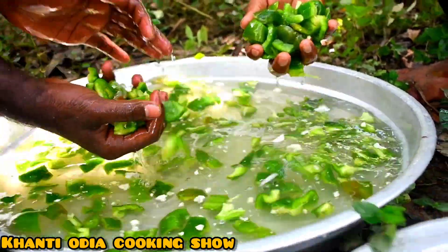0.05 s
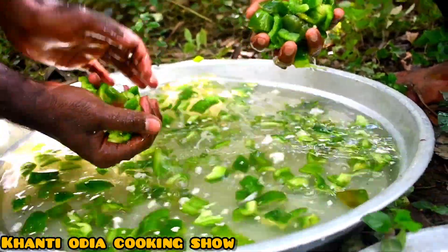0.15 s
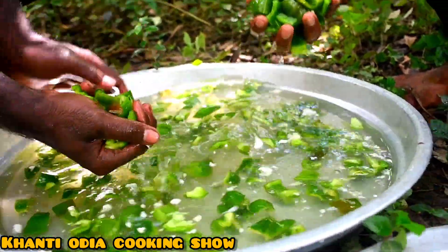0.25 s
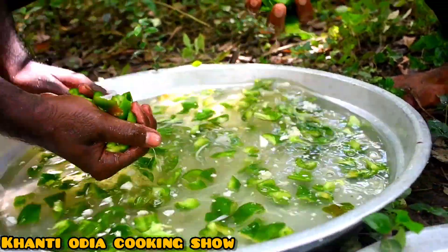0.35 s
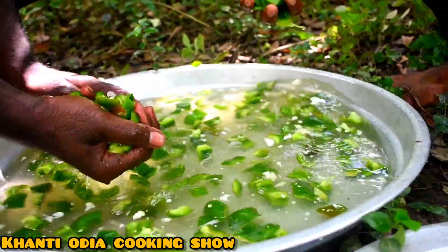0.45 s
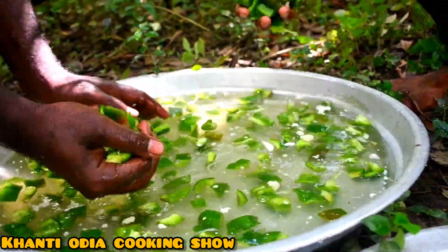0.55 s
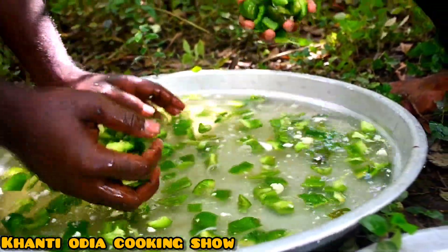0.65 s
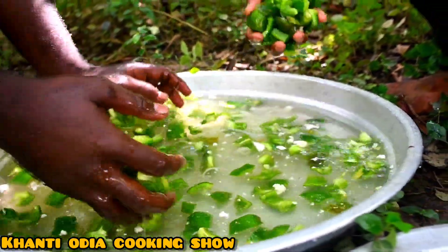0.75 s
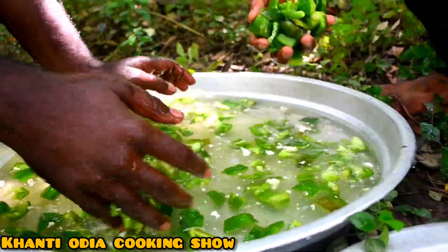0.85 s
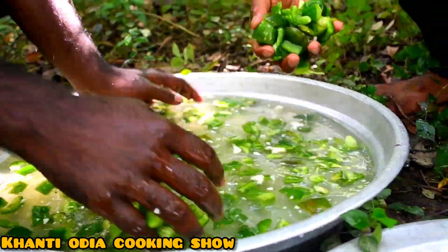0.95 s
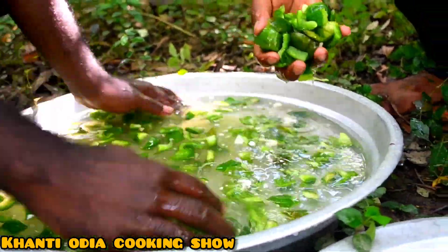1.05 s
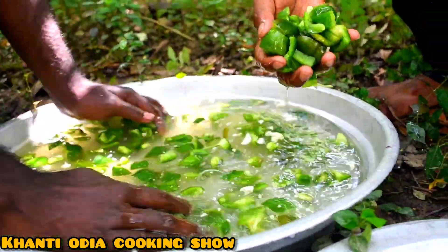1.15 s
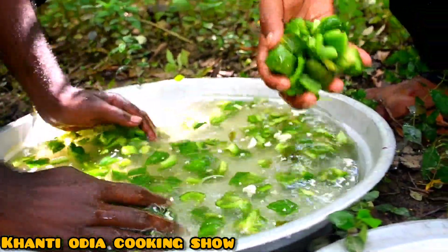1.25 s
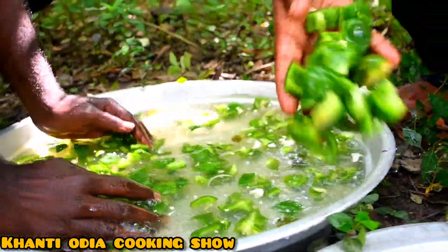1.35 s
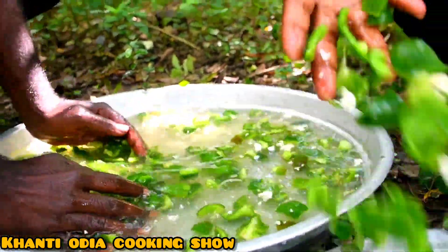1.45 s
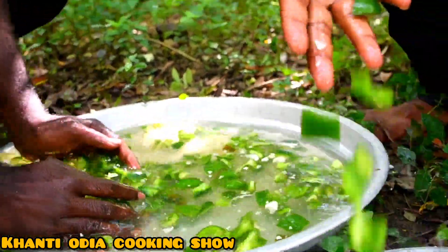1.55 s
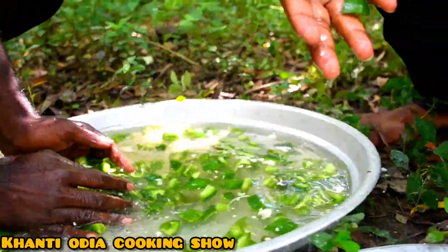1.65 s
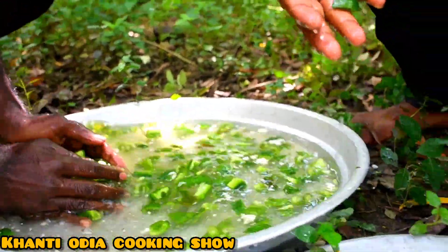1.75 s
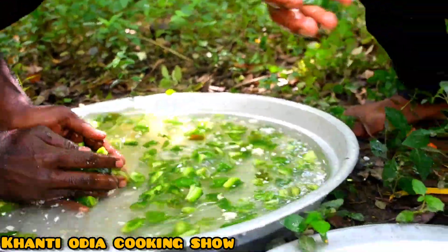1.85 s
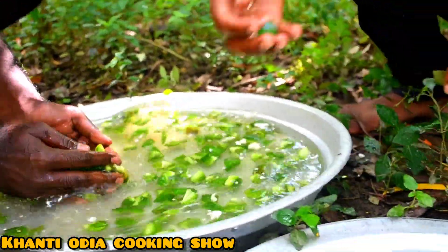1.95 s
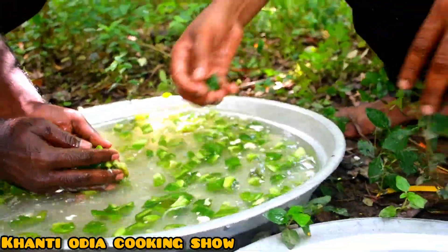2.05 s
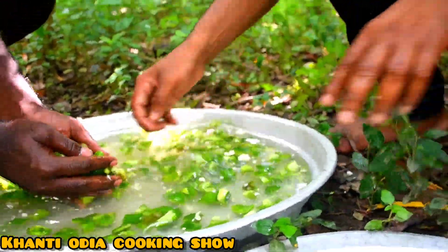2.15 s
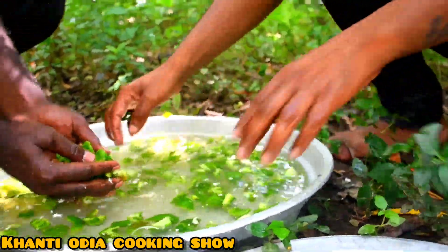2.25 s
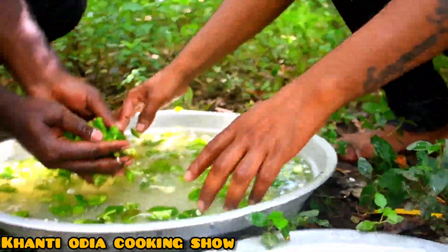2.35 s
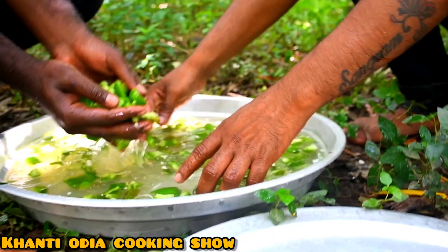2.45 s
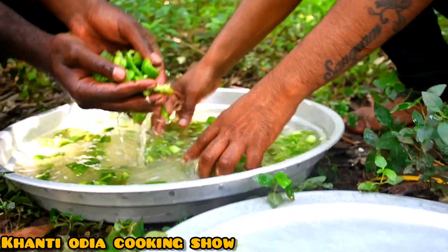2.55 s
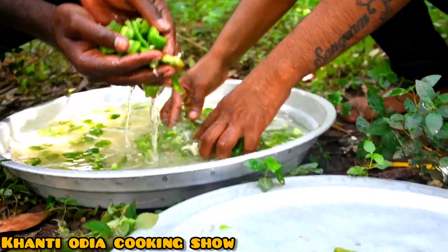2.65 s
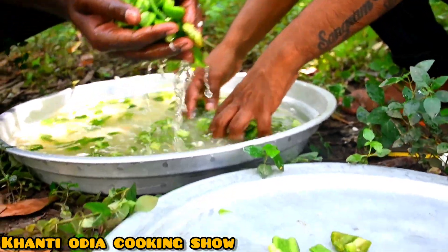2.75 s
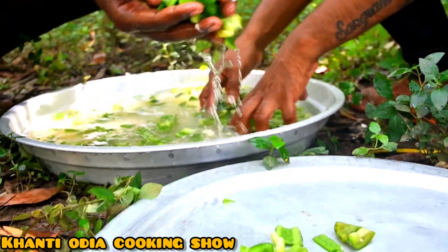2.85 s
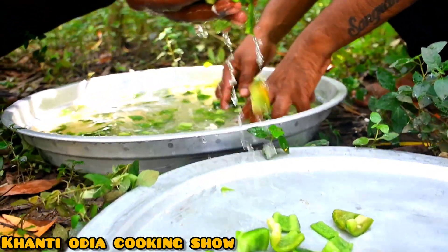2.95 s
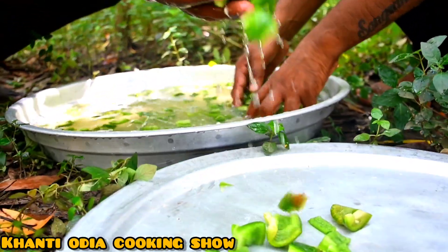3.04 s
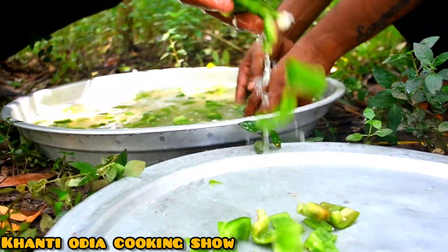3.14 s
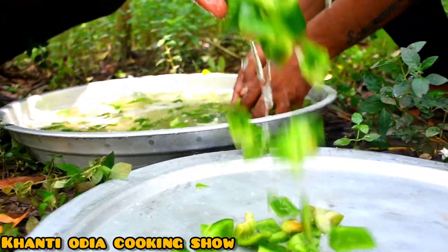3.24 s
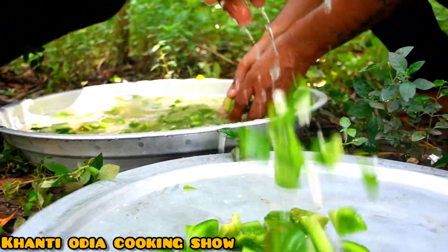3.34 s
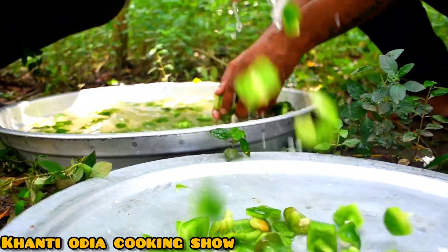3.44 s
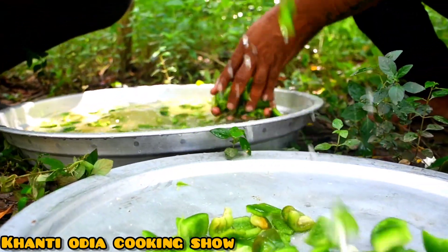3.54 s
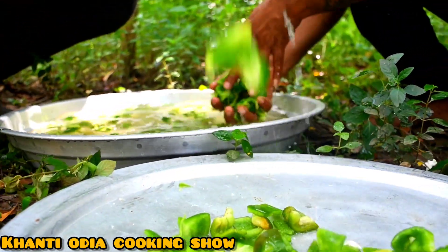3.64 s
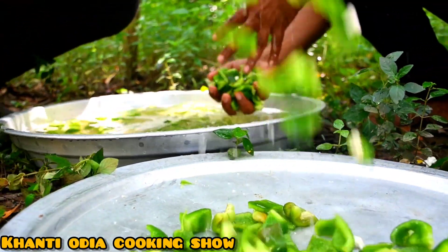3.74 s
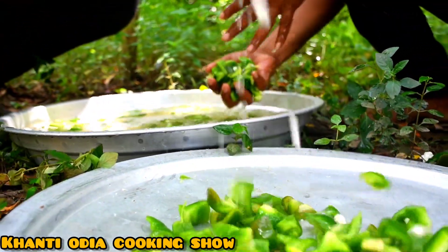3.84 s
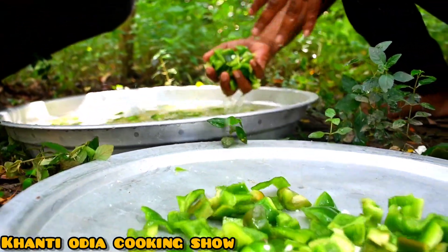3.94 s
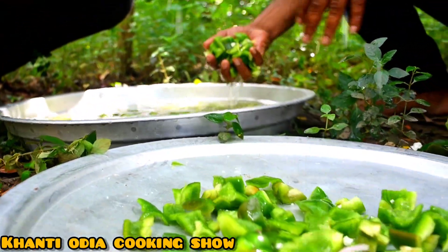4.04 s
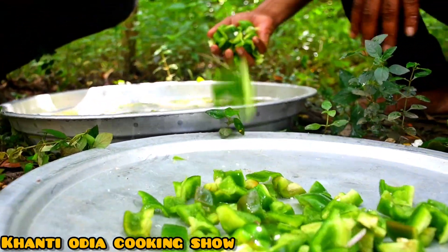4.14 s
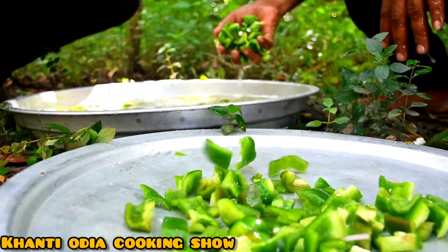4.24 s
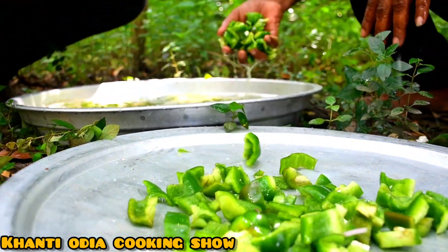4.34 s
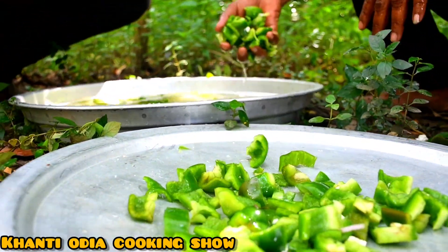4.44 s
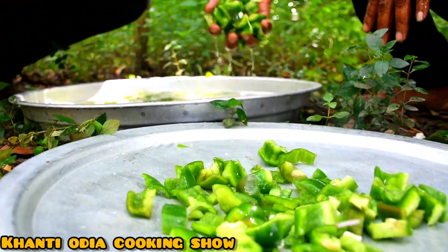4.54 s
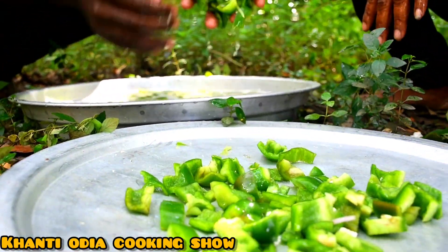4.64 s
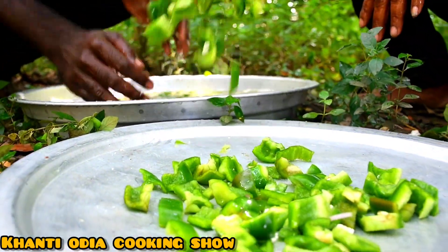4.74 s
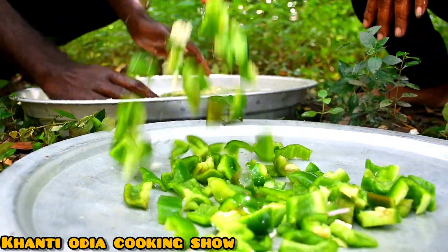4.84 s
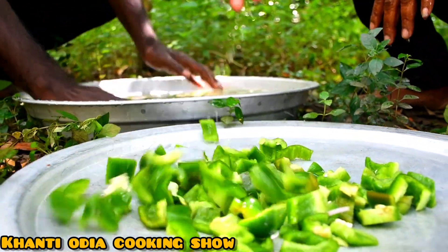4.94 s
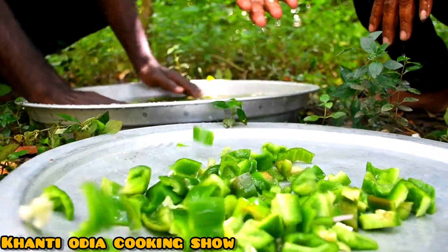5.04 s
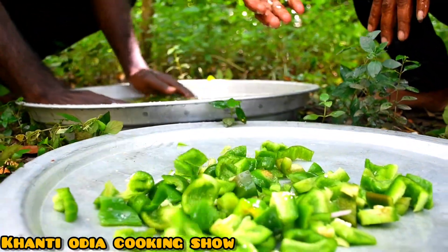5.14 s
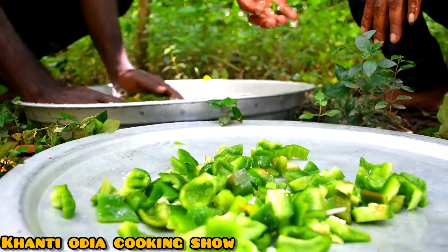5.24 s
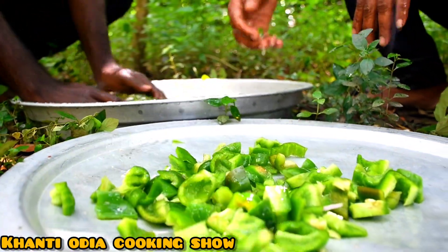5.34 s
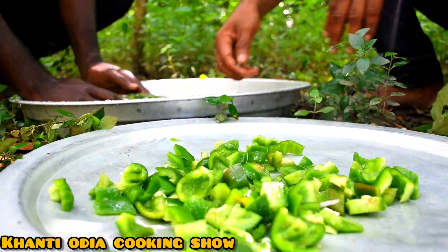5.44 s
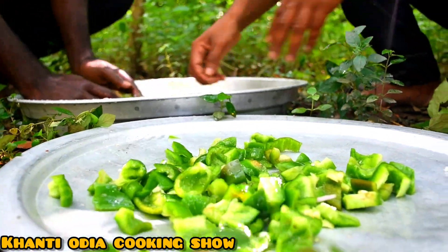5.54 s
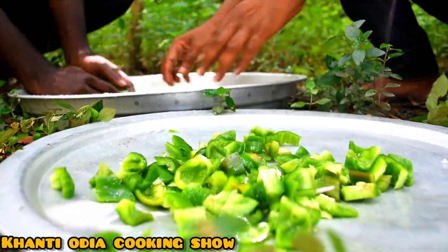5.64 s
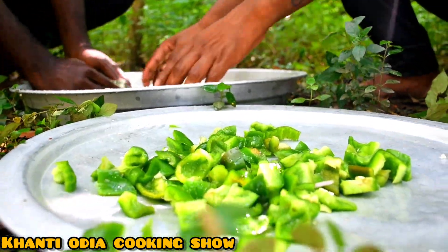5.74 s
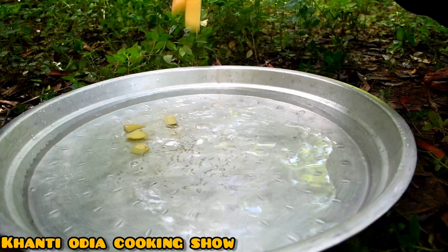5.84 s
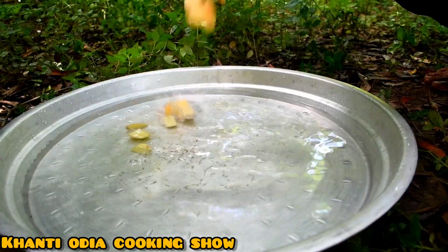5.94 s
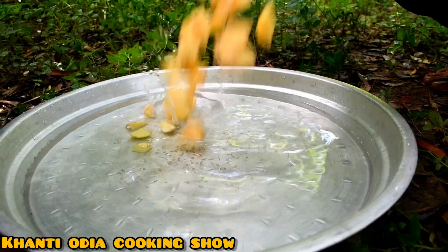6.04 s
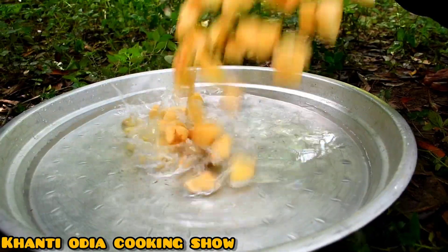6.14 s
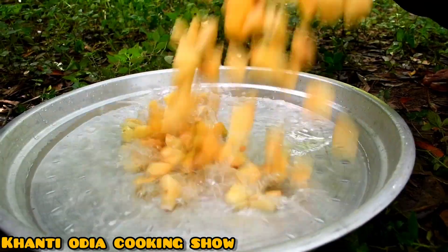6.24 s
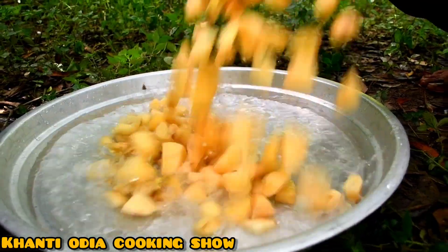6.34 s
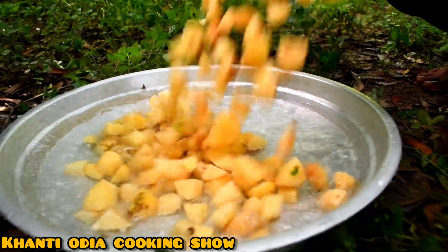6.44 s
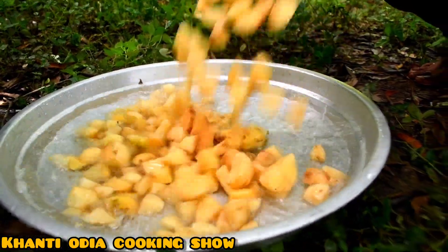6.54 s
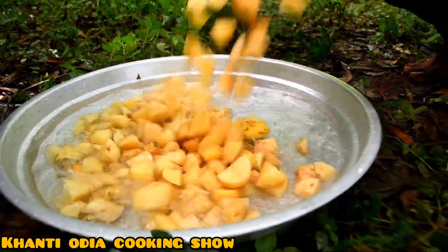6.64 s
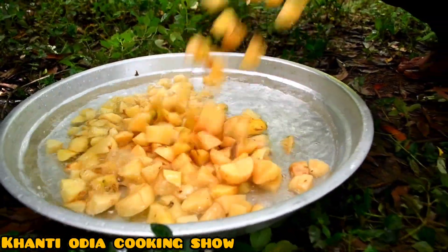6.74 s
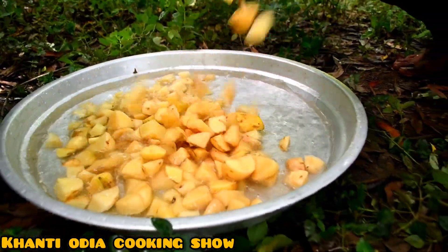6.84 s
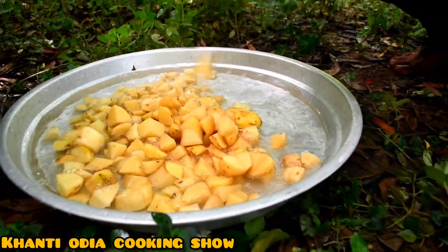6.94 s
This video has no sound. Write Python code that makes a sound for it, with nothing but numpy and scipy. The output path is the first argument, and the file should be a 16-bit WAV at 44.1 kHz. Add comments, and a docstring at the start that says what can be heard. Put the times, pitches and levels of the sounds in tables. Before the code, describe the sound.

Wet vegetable chunks clatter in handfuls onto a thin metal tray outdoors, with water drips and trickles between, then heavier pieces pour splashing into shallow water.

```python
"""A soft dull knock on thin metal is heard first over insect hiss, then water drips and trickles.
Wet vegetable pieces, scooped from a metal basin outdoors, are thrown on a thin tray: its damped modes ring.
Filtered grainy noise makes the tumbling and spray; brief rising sines make drops and bubbles.
At the end heavier pieces pour into a tray of shallow water; a close pair of microphones listens."""
import sys
import numpy as np
from scipy import signal
from scipy.fft import rfft, irfft, next_fast_len
from scipy.io import wavfile
from scipy.ndimage import uniform_filter1d

SR = 44100
rng = np.random.default_rng(int(sys.argv[2]) if len(sys.argv) > 2 else 0)


def store_wav(level_fs):
    """Save 16-bit WAV to argv[1]."""
    pcm = np.round(np.clip(np.atleast_2d(level_fs), -1, 1) * 32767)
    wavfile.write(sys.argv[1], SR, pcm.T.astype(np.int16))


N = 308259


def gain_of(db):
    """Amplitude factor of a level in dB."""
    return 10 ** (np.asarray(db) / 20)


def evened(x):
    """Scales to unit RMS."""
    return x / np.sqrt(np.mean(x ** 2) + 1e-20)


def read(points, hz):
    """Interpolates a table of (Hz, value) on a log frequency axis."""
    point_hz, value = np.transpose(points)
    return np.interp(np.log(hz + 1), np.log(point_hz + 1), value)


def coloured(x, points):
    """Filters by a gain curve in dB over frequency."""
    length = x.shape[-1]
    size = next_fast_len(length)
    gain = gain_of(read(points, np.fft.rfftfreq(size, 1 / SR)))
    return irfft(rfft(x, size) * gain, size)[..., :length]


def band(x, hz, spread):
    """Band-pass from hz / spread to hz * spread."""
    edges_hz = np.clip([hz / spread, hz * spread], 30, .45 * SR)
    return signal.sosfilt(signal.butter(2, edges_hz, "band", fs=SR, output="sos"), x)


def decay(t, t60_s):
    """Exponential fade, 60 dB in t60_s."""
    return gain_of(-60 * t / t60_s)


def peaked(x):
    """Scales to unit peak."""
    return x / abs(x).max()


def curve(tables, column):
    """One dB column over the whole scene, silent outside the tables."""
    t, level_db = np.arange(N) / SR, np.full(N, -150.)
    for rows in map(np.array, tables):
        inside = (t >= rows[0, 0]) & (t <= rows[-1, 0])
        level_db[inside] = np.interp(t[inside], rows[:, 0], rows[:, column])
    return level_db


def swells(rows, column, rise_s, db_per_s):
    """Levels rise up to full_s, hold, then fade at a steady dB rate; overlaps add in power."""
    t, power = np.arange(N) / SR, np.zeros(N)
    for row in rows:
        full_s, hold_s = row[:2]
        rise = np.clip((t - full_s) / rise_s + 1, 0, 1)
        level_db = row[column] - db_per_s * np.maximum(t - full_s - hold_s, 0)
        power += (rise ** 2 * gain_of(level_db)) ** 2
    return np.sqrt(power)


def paired(two, likeness):
    """Mixes two unrelated signals into a left and right that agree as far as the likeness says."""
    size = next_fast_len(N)
    common, apart = rfft(two, size)
    same = np.clip(read(likeness, np.fft.rfftfreq(size, 1 / SR)), 0, 1)
    mid, side = np.sqrt((1 + same) / 2) * common, np.sqrt((1 - same) / 2) * apart
    return irfft(np.array([mid + side, mid - side]), size)[:, :N]


def add(mix, start_s, sound, left_minus_right_db):
    """Adds a sound at start_s with a level difference between the sides."""
    part = mix[:, round(start_s * SR):][:, :sound.shape[-1]]
    panned = sound * gain_of([[left_minus_right_db / 2], [-left_minus_right_db / 2]])
    part += panned[:, :part.shape[1]]


def grainy(per_s, spread_db, t60_s, steady):
    """Two noises whose loudness jumps with sparse arrivals of random size, each dying in t60_s."""
    sizes = gain_of(spread_db * np.minimum(rng.exponential(1, N), 4))
    arrivals = sizes * (rng.random(N) < per_s / SR)
    loudness = signal.lfilter([1], [1, -1000 ** (-1 / (t60_s * SR))], arrivals)
    return (steady + evened(loudness)) * rng.standard_normal((2, N))


def rung(blows, modes, linger):
    """Blows set resonators ringing, each linger times as long as its tabled t60."""
    out = 0
    for hz, db, t60_s in modes:
        radius, turn = 1000 ** (-1 / (linger * t60_s * SR)), 2 * np.pi * hz / SR
        poles = [1, -2 * radius * np.cos(turn), radius * radius]
        out = out + gain_of(db) * np.sin(turn) * signal.lfilter([1], poles, blows)
    return evened(out)


def bubbles(per_s, low_hz, high_hz, turns, count):
    """Short rising sine grains scattered at random, a few large."""
    out = np.zeros((2, N))
    for hz in np.geomspace(low_hz, high_hz, count):
        cycles = np.arange(int(3 * turns * SR / hz)) * hz / SR
        grain = np.sin(2 * np.pi * cycles * (1 + 0.1 * cycles / turns))
        grain = grain * np.exp(-1.5 * cycles / turns) * (1 - np.exp(-cycles))
        sizes = gain_of(1.5 * np.minimum(rng.exponential(1, N), 4))
        arrivals = sizes * (rng.random(N) < per_s / count / SR)
        out += signal.oaconvolve(arrivals, grain)[:N] * rng.uniform(0.11, 1, (2, 1))
    return evened(out)


# droplet size bands: centre_hz
DROPLET_BANDS = (1700, 3500, 7200, 14000)
# colour of flying water: freq_hz, gain_db
SPLASH_COLOUR = [(710, -38.5), (1200, -8), (1700, -5), (2600, -4.5), (9010, -2), (12100, -18),
                 (14400, -13.5), (16000, -27.5)]


def spatter(per_s, spread_db, t60_s, steady):
    """Flying water: droplets of each size crackle in a band of their own."""
    bands = sum(band(grainy(per_s, spread_db, t60_s, steady), hz, 1.55) for hz in DROPLET_BANDS)
    return evened(coloured(bands, SPLASH_COLOUR))


# left-right agreement of the yard: freq_hz, likeness_0_to_1
YARD_LIKENESS = [(60, 1), (300, 0.86), (700, 0.84), (1500, 0.48), (3000, 0.15)]
# colour of the yard: freq_hz, gain_db
YARD_COLOUR = [(24, -41), (40, -6), (96, -3), (147, -7), (680, -14.5), (1480, -16.5), (2840, -18.5),
               (4800, -18), (5440, -15.5), (6300, -18), (7400, -19.5), (9000, -13.5), (11500, -27),
               (14500, -26), (16000, -39)]
# insect songs: full_s, hold_s, level_db
INSECT_SONGS = [(.32, 0.36, -70), (2.62, .2, -67), (4.5, 0.31, -57.5)]


def yard():
    """Noise shaped as distant rumble and insect hiss, stray drips, and an insect trilling on a narrow band."""
    hiss = evened(coloured(paired(rng.standard_normal((2, N)), YARD_LIKENESS), YARD_COLOUR))
    waver_db = 1.2 * evened(uniform_filter1d(rng.standard_normal(N), size=6000))
    air = gain_of(-57) * hiss * gain_of(waver_db)
    drips = spatter(40, 3.5, .02, .1) + .5 * bubbles(25, 900, 5000, 6, count=10)
    trill = 0.45 + np.sin(np.pi * 47.4 * np.arange(N) / SR) ** 2  # 47.4 pulses per s
    song = evened(trill * band(rng.standard_normal((2, N)), 5460, 1.025))
    return air + gain_of(-66.5) * drips + swells(INSECT_SONGS, 2, 0.029, 250) * song


# dull bumps through the ground: start_s, level_db, pitch_hz
GROUND_BUMPS = [(2.788, -35.5, 183), (3.255, -45, 45), (4.162, -38, 177)]


def bumps():
    """A soft low push of a few cycles, dying exponentially."""
    out = np.zeros((2, N))
    for start_s, level_db, hz in GROUND_BUMPS:
        cycles = np.arange(int(4 * SR / hz)) * hz / SR
        push = np.sin(2 * np.pi * cycles) * np.exp(-1.3 * cycles)
        add(out, start_s, gain_of(level_db) * push, -2.5)
    return out


# trapped bubbles: start_s, level_db, first_pitch_hz, last_pitch_hz, length_s
TRAPPED_BUBBLES = [ (5.728, -53, 1310, 1400, 0.051), (6.211, -20.5, 1560, 1680, 0.026),
                   (0.121, -36.5, 1300, 2280, 0.029), (1.074, -26, 5200, 5600, 0.0037),
                   (1.196, -51, 1060, 1120, 0.026), (1.223, -31.5, 1950, 3900, 0.021),
                   (1.221, -43.5, 1166, 1270, 0.021), (1.224, -34, 4120, 4300, 0.0049),
                   (1.289, -36.5, 2800, 3500, 0.01), (2.542, -33.5, 4850, 5400, 0.01),
                   (2.713, -37, 2080, 2480, 0.018), (2.818, -43, 1127, 1340, 0.047),
                   (3.091, -35, 4750, 5000, 0.0097), (4.367, -38, 1550, 2230, 0.055),
                   (5.29, -49.5, 1250, 1470, 0.033)]


def gurgles():
    """A bubble swells, and its pitch climbs as it nears the surface."""
    out = np.zeros((2, N))
    for start_s, level_db, first_hz, last_hz, length_s in TRAPPED_BUBBLES:
        u = np.linspace(0, 1, int(length_s * SR))
        # ripples shake the bubble
        wobble = 1 + 3.5 * uniform_filter1d(rng.standard_normal(3000), size=90)[:len(u)]
        cycles = np.cumsum(first_hz + (last_hz - first_hz) * u ** 1.5) / SR
        envelope = np.sqrt(12 * u) * np.exp(-3.2 * u) * (1 - u ** 4)
        add(out, start_s, gain_of(level_db) * wobble * np.sin(2 * np.pi * cycles) * envelope, -3.)
    return out


# drops bursting on water or metal: start_s, burst_level_db, pitch_hz, tick_re_burst_db
BURSTING_DROPS = [(0.0945, -36, 2870, -11), (0.121, -28, 6000, -5), (0.2173, -22, 1350, 0.5),
                  (0.754, -37, 4300, 3), (0.763, -32.5, 6200, 6), (0.823, -38, 3980, 8.5),
                  (0.83, -36.5, 1200, -5), (0.868, -39.5, 5070, 20), (0.888, -40.5, 1420, -13),
                  (0.9007, -41.5, 5500, 14.5), (0.997, -36, 3400, -9), (1.0278, -35.5, 1370, -14),
                  (1.059, -36, 5900, 8), (1.125, -36, 7740, -4), (2.45, -37, 4470, -4),
                  (2.481, -30.5, 1082, 3), (2.548, -40, 1350, -13), (2.618, -34.5, 2750, -1),
                  (2.663, -42, 2500, -15), (2.7281, -31.5, 2900, 8), (2.785, -36.5, 1890, -2),
                  (2.812, -33, 5560, -3), (2.938, -26.5, 8400, -3), (2.986, -37, 7000, -9),
                  (3.023, -36, 900, 10.5), (4.051, -34, 2360, -18), (4.229, -37.5, 2400, 1),
                  (4.4198, -36.5, 1790, 2.5), (4.473, -39, 6840, -7), (4.524, -34.5, 7370, -8),
                  (5.188, -31.5, 8100, -12), (5.926, -12, 5260, -10), (5.9359, -13.5, 1970, 5.5),
                  (6.04, -20.5, 3700, 10), (6.084, -15, 6500, -6), (6.25, -19, 2070, -15),
                  (6.432, -17.5, 4470, -3), (6.478, -29, 1500, -20), (6.573, -24.5, 1850, 10),
                  (6.587, -18, 4640, -4), (6.626, -21.5, 2520, -6), (6.775, -27, 6650, 3),
                  (6.126, -10, 7260, 4.5), (6.139, -15, 6030, 6), (6.173, -12, 3500, -18),
                  (6.2243, -9, 2510, -10), (6.263, -13, 2260, -4), (6.306, -24, 2350, 16),
                  (6.401, -9.5, 4220, 2), (6.4962, -17.5, 4070, -17), (6.613, -15.5, 3570, 6.5),
                  (6.64, -17, 3720, 8), (6.668, -30.5, 4850, 13), (6.74, -23, 7600, 6),
                  (6.791, -24.5, 5560, 5.5), (6.8704, -30, 4970, 7.5)]
DROP_T60_AT_1K_S, DROP_T60_SLOPE = 0.024, -0.41  # smaller, higher cavities die sooner


def drops():
    """A sharp tick; the cavity that the drop punches rings briefly, its pitch climbing, in a puff of spray."""
    t, out = np.arange(4000) / SR, np.zeros((2, N))
    for start_s, burst_db, hz, tick_db in BURSTING_DROPS:
        t60_s = DROP_T60_AT_1K_S * (hz / 1000) ** DROP_T60_SLOPE
        fade = decay(t, t60_s)
        noise = rng.standard_normal((3, len(t)))
        puff = band((noise[0] + 0.5 * noise[1:]) * fade, hz, 1.62)
        plop = np.sin(2 * np.pi * hz * t * (1 + .06 * t / t60_s)) * fade * (1 - np.exp(-t * hz)) ** 2
        burst = peaked(peaked(plop) + .9 * peaked(puff))
        tick = band(noise[1:] * (decay(t, 0.015) + 0.29 * decay(t, 0.081)), 5900, 1.66)
        add(out, start_s, gain_of(burst_db) * (burst + gain_of(tick_db) * peaked(tick)), -2.)
    return out


# hands swishing, water running off them: full_s, hold_s, level_db
HAND_SWISHES = [(.2, 0.025, -49.5), (.79, 0.095, -49), (.99, 0.084, -43.5), (1.18, 0.11, -54.5),
                (1.95, 0.041, -44), (2.05, 0.18, -56.5), (2.44, 0.18, -46.5), (2.7, 0.064, -44.5),
                (2.85, 0.21, -48), (5.47, 0.054, -53.5), (5.7, 0.32, -56), (5.89, 0.058, -47)]
SWISH_RISE_S, SWISH_DB_PER_S = 0.033, 115.5


def trickle():
    """Fine spatter, small bubbles and a few larger, lower ones as water runs off the hands."""
    fine = spatter(130, 3.6, 0.018, 0.4)
    small = bubbles(200, 1300, 6000, 4, count=12)
    large = bubbles(120, 380, 990, 2, count=8)
    level = swells(HAND_SWISHES, 2, SWISH_RISE_S, SWISH_DB_PER_S)
    return level * (fine + 0.27 * small + 0.1 * large)


# heavy pieces into shallow water, one list per pour: time_s, thump_level_db, splash_level_db
POUR_LEVELS = [
    [(5.922, -39, -25), (5.945, -28, -32), (6.0, -31.5, -43), (6.035, -30, -25), (6.14, -27.5, -24),
     (6.25, -26.5, -17), (6.38, -29, -25.5), (6.5, -32.5, -28), (6.74, -37, -39), (6.82, -47, -44),
     (6.99, -67.5, -59.5)],
]
# colour of pieces on the flooded tray: freq_hz, gain_db
THUMP_COLOUR = [(41, -44), (70, -25.5), (162, -6), (374, -6.5), (482, -8.5), (802, -5.5), (945, -4.5),
                (1850, -17), (2500, -23), (3250, -77)]
# modes of the tray under water: pitch_hz, gain_db, t60_s
FLOODED_MODES = [(490, 7.5, 0.06), (570, -0.5, 0.073), (660, 16, 0.015), (1000, 0, 0.047)]
# left-right agreement of close sounds (pour and heaps): freq_hz, likeness_0_to_1
NEAR_LIKENESS = [(200, 0.94), (600, 0.97), (1200, 0.69), (2500, 0.51), (6000, 0.031)]


def pour():
    """Dense thumps that keep the flooded tray ringing, a crackling splash and popping bubbles."""
    blows = grainy(250, 2.5, .025, .9)
    ringing = band(rung(blows, FLOODED_MODES, 1), 750, 2.5)
    thumps = evened(evened(coloured(blows, THUMP_COLOUR)) + .7 * ringing)
    crackle = spatter(220, 4.2, .01, .55)
    splash = evened(crackle + 0.32 * bubbles(300, 1180, 6200, 4.3, count=14))
    levelled = gain_of(curve(POUR_LEVELS, 1)) * thumps + gain_of(curve(POUR_LEVELS, 2)) * splash
    return paired(levelled, NEAR_LIKENESS)


# handfuls tumbling on the tray: full_s, hold_s, rumble_level_db, rattle_level_db, spray_level_db
HANDFULS = [(0, 0.0091, -39.5, -50, -30.5), (1.415, 0.009, -36.5, -82, -60.5),
            (1.447, 0.084, -18, -31.5, -32), (1.59, 0.033, -17, -30, -35), (1.72, 0.19, -44, -73, -59.5),
            (3.17, 0.046, -33.5, -53, -45.5), (3.28, 0.11, -32.5, -44.5, -44), (3.48, 0.037, -35, -61, -51),
            (3.77, 0.0088, -32, -30, -36.5), (3.9, 0.32, -54.5, -52.5, -69),
            (4.81, 0.02, -34.5, -37, -45.5), (4.88, 0.029, -32, -34.5, -40.5),
            (5.07, 0.02, -45, -45.5, -48)]
HEAP_RISE_S, RUMBLE_DB_PER_S, RATTLE_DB_PER_S, SPRAY_DB_PER_S = 0.023, 131.5, 300.5, 142
# colour of damped pieces jostling on the metal: freq_hz, gain_db
JOSTLE_COLOUR = [(120, -58.5), (200, -51), (424, -11.5), (603, -5.5), (650, -8), (923, -6.5), (4000, -51),
                 (8800, -120)]
# tray modes (heaps and knocks), decay before load scaling: pitch_hz, gain_db, nominal_t60_s
TRAY_MODES = [(309.2, 0, .35), (437.3, -0.5, 0.082), (487, -0.5, 0.1), (536, -6, 0.13), (600, -2, .11),
              (683.7, -2.5, .1), (755.6, -1, .06), (803.8, -0.5, 0.057), (942, -3, 0.052),
              (1060, -5.5, 0.11), (1178.6, -6, 0.054), (1300, -6.5, 0.056), (1450, -13, .05),
              (1560, -4, 0.04), (1736, -4.5, .055), (1937, -8.5, 0.027), (2170, -5, 0.045),
              (2335, -2, 0.035), (2590, -13.5, .05), (2850, -8, 0.031), (3174, -13.5, 0.019),
              (3600, -12.5, 0.061)]


def heaps():
    """Many small blows clatter and keep the tray modes ringing while spray crackles above."""
    upper_modes = TRAY_MODES[1:]  # a heap smothers the lowest mode
    metal = rung(grainy(100, 1.9, 0.087, 0.33), upper_modes, 1.7)
    jostle = grainy(300, 2.8, .012, .25)
    rumble = evened(1.2 * metal + evened(coloured(jostle, JOSTLE_COLOUR)))
    ringing = evened(band(rung(jostle, upper_modes, .8), 2400, 1.6))
    rattle = evened(ringing + .8 * evened(band(jostle, 2400, 1.6)))
    spray = evened(spatter(170, 4.2, .012, .4) + .35 * bubbles(500, 1500, 6500, 4, count=10))
    rumble = rumble * swells(HANDFULS, 2, HEAP_RISE_S, RUMBLE_DB_PER_S)
    rattle = rattle * swells(HANDFULS, 3, HEAP_RISE_S, RATTLE_DB_PER_S)
    spray = spray * swells(HANDFULS, 4, HEAP_RISE_S, SPRAY_DB_PER_S)
    return paired(rumble + rattle + spray, NEAR_LIKENESS)


# pieces landing: start_s, knock_level_db, centre_hz, lowest_mode_re_knock_db, slap_re_knock_db
LANDINGS = [(0.001, -32.5, 785, -37, -20), (0.044, -43, 770, -19, -20), (1.41, -20.5, 670, -21, -14),
            (1.44, -8, 2850, -31, -1.5), (1.459, -9, 2130, -41.5, -10), (1.475, -2.5, 600, -52, 3),
            (1.543, -27, 600, -35, -9), (1.555, -7.5, 724, -20, -6), (1.571, -11.5, 795, -29, -24),
            (1.606, -5, 650, -47, -7), (1.625, -5.5, 615, -37, -15), (1.661, -6.5, 666, -27.5, -35),
            (1.675, -6, 706, -45, -16.5), (1.806, -21.5, 910, -27, -38), (1.853, -13.5, 650, -32, -20.5),
            (1.913, -26, 895, -24, -11), (1.957, -30.5, 750, -32, 0), (1.99, -36, 950, -19, -3),
            (3.014, -24, 568.5, -22.5, -18), (3.058, -34, 654, -30, 0), (3.151, -3.5, 1150, -52, -19.5),
            (3.183, -14.5, 476, -32, -8.5), (3.209, -22.5, 800, -10.5, -3), (3.232, -27, 1720, -8, -25),
            (3.256, 2, 871, -27, -14.5), (3.289, -11.5, 842, -45.5, -15), (3.292, 0.5, 1560, -43, -18),
            (3.317, -8.5, 820, -41, -7.5), (3.345, -10, 2100, -36, -12), (3.364, -28, 1560, -40, 13),
            (3.379, -14, 1520, -16.5, -14), (3.404, -5.5, 865, -23.5, -16), (3.483, -27.5, 885, -28, 4),
            (3.508, -15.5, 1498, -24.5, -10), (3.564, -23.5, 1520, -28, -15),
            (3.637, -17.5, 2042, -37, 1.5), (3.701, -31, 720, -13, -1), (3.729, -19.5, 700, -38, -8.5),
            (3.761, -7.5, 568, -8.5, -11), (3.78, -16, 547, -22, 3.5), (3.815, -14, 550, -26, -4.5),
            (3.921, -21.5, 535, -35.5, -32), (3.93, -12.5, 1832, -28, -14.5), (4.036, -26, 625, -23, -12.5),
            (4.074, -27, 868, -37, -9), (4.121, -48, 1000, -33, 11), (4.162, -24.5, 665, -32, -6.5),
            (4.192, -34, 622, -40, 3), (4.257, -28, 1570, -36, -14), (4.264, -31.5, 490, -37.5, -28),
            (4.283, -36.5, 1370, -34, -2), (4.357, -40, 520, -44, 8), (4.608, -19, 2030, -51, -5.5),
            (4.782, -17.5, 600, -32, -16), (4.796, -16, 710, -29, -14), (4.805, -11.5, 1496, -43, -4.5),
            (4.817, -10, 2420, -33, -2.5), (4.825, -10.5, 690, -31, -10), (4.842, -10, 1840, -41, -18),
            (4.849, -19, 710, -37, 7.5), (4.888, -18, 606, -52, -8), (4.905, -10, 2254, -42, -25),
            (4.924, -6, 1310, -49, -30), (4.925, -7.5, 870, -56, -27), (5.067, -25.5, 570, -45, -5),
            (5.105, -32, 487, -33, -2.5), (5.22, -31.5, 510.6, -40, -24), (5.366, -39.5, 680, -39, 1.5),
            (5.935, -13.5, 1000, -25.5, 1), (5.962, -14.5, 536, -35, -23), (6.108, -12, 490, -40, -30),
            (6.444, -19.5, 634, -31, 8.5)]
DAMPING_AT_1K, DAMPING_SLOPE = 0.69, 0.052  # the load damps the tray; a higher knock dies sooner


def knocks():
    """A blow rings the modes near its hardness, with a sharp damped thud and a wet slap on top."""
    out, long_t, t = np.zeros((2, N)), np.arange(14000) / SR, np.arange(4400) / SR
    hz, db, t60_s = np.transpose(TRAY_MODES)[:, :, None]
    for start_s, level_db, centre_hz, low_db, slap_db in LANDINGS:
        damping = DAMPING_AT_1K * (centre_hz / 1000) ** DAMPING_SLOPE
        spot = rng.standard_normal((3, len(TRAY_MODES)))  # each landing place weights the modes anew
        loaded_hz = hz[1:] * (1 + 0.012 * spot[2, 1:, None])  # pieces lying on the tray shift its modes
        octaves = np.log2(hz[:, 0] / centre_hz)
        # a stronger blow reaches higher
        db_per_octave2 = np.where(octaves < 0, 14, 3.5 - .25 * level_db)
        reach = gain_of(-db_per_octave2 * octaves ** 2)
        sides = 1 + .9 * spot[0] + np.outer([1, -1], spot[1] * hz[:, 0] / 1800)
        nearest = abs(octaves) == abs(octaves).min()  # the mode nearest the centre stands out and lingers
        fade = np.where(nearest, .9, 1.3)[1:, None] * damping
        rings = gain_of(db[1:] - 60 * fade * t / t60_s[1:]) * np.sin(2 * np.pi * loaded_hz * t)
        ring = (sides * reach + 3. * nearest)[:, 1:] @ rings

        noise = rng.standard_normal((3, len(t)))
        blow = (noise[0] + .6 * noise[1:]) * decay(t, .03 / damping)
        blow[:, :12] += 1.4  # the first contact is one short push
        spread = 2.3 + .02 * level_db  # a soft blow is a narrow pop
        thud = band(band(blow, centre_hz, spread), centre_hz, spread)
        knock = peaked(peaked(ring) + 0.7 * peaked(thud))

        wet = decay(t, .015) + .25 * decay(t, .045)
        slap = band(noise[1:] * wet, 7000 * 0.92 ** spot[0, 0], 1.474)
        add(out, start_s, gain_of(level_db) * (knock + gain_of(slap_db) * peaked(slap)), -2.5)

        lowest = gain_of(low_db) * decay(long_t, t60_s[0]) * np.sin(2 * np.pi * hz[0] * long_t)
        lowest = lowest * (1 - np.exp(-long_t / 0.0021))
        add(out, start_s, gain_of(level_db) * lowest[None], -2.5)
    return out


def scene():
    """Yard, water and pour lie under the struck tray, which thuds the ground along."""
    beds = pour() + trickle() + yard()
    blows = knocks() + heaps() * gain_of([[-1.1], [1.1]])
    # the knocks and heaps are cut away below about 280 Hz
    tray = signal.sosfilt(signal.butter(4, 280, "high", fs=SR, output="sos"), blows)
    ground = gain_of(-13.5) * band(blows, 210, 1.7)
    return beds * gain_of([[-.9], [.9]]) + bumps() + gurgles() + drops() + tray + ground


EDGE_HZ = 16100


def record(dry):
    """Peaks beyond full scale clip; then a low-pass limits the band."""
    lowpass = signal.firwin(511, EDGE_HZ, window=("kaiser", 9), fs=SR)
    return signal.oaconvolve(np.clip(dry, -1, 1), lowpass[None], "same")


dry = scene()
out = record(dry)
store_wav(out)
```